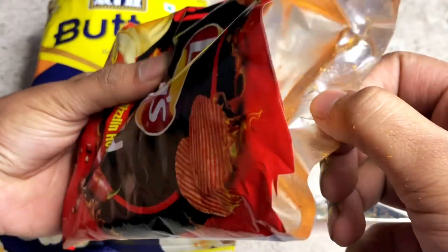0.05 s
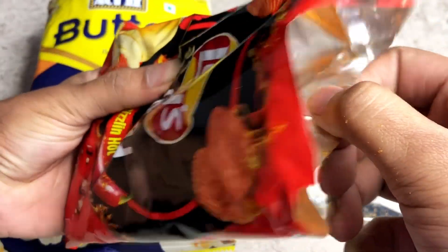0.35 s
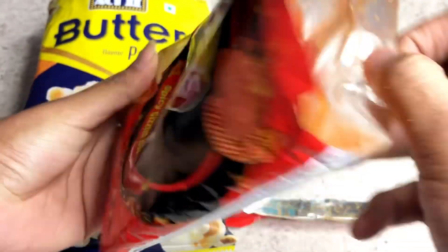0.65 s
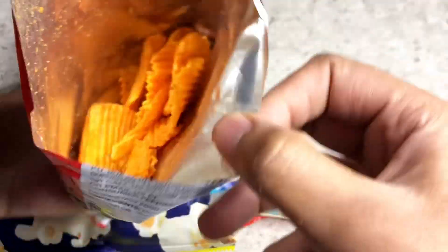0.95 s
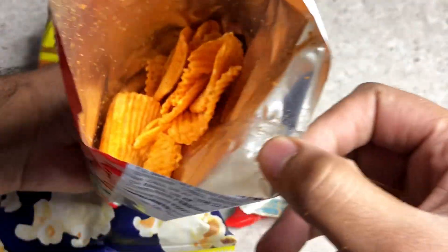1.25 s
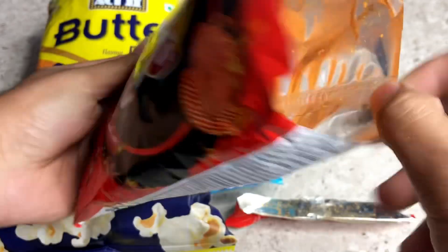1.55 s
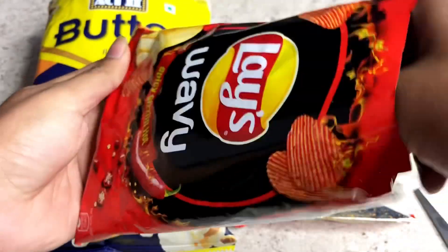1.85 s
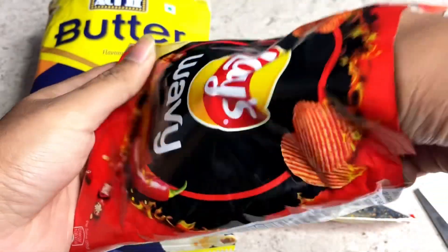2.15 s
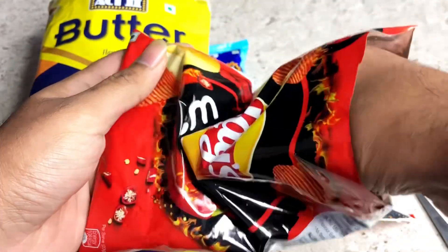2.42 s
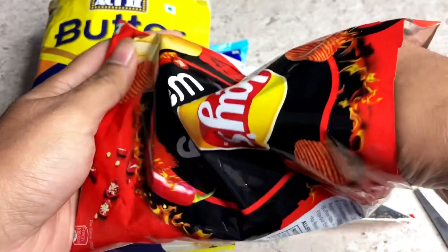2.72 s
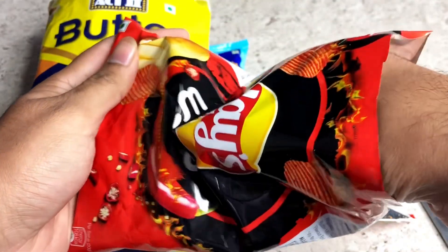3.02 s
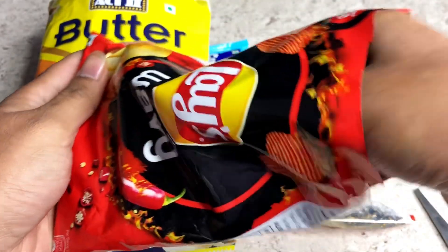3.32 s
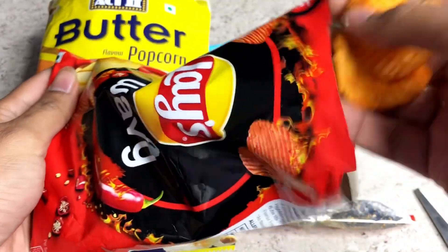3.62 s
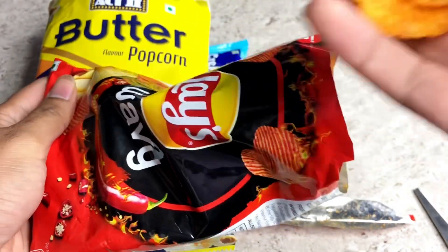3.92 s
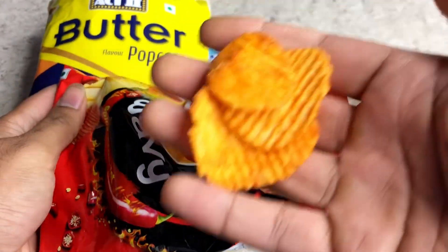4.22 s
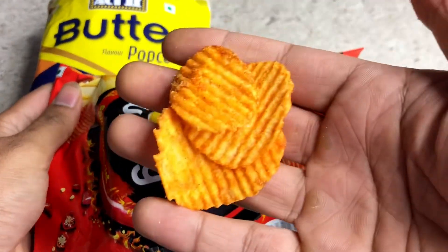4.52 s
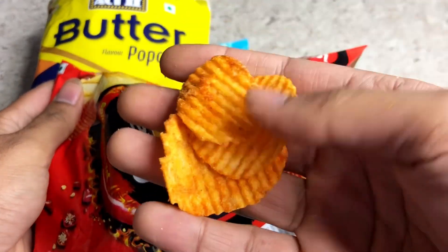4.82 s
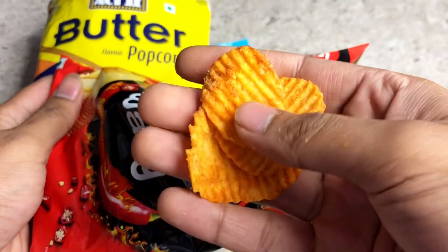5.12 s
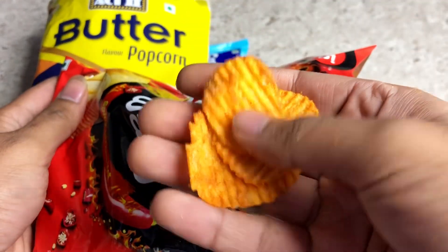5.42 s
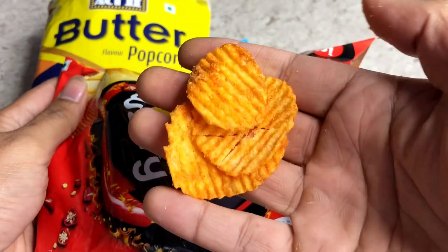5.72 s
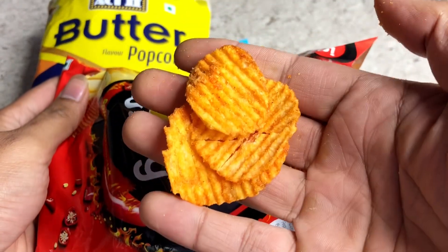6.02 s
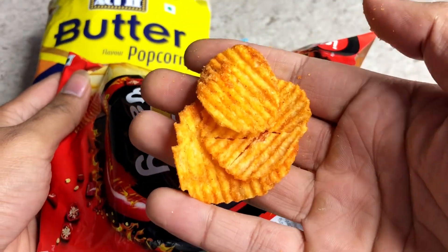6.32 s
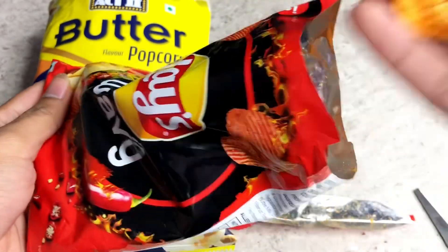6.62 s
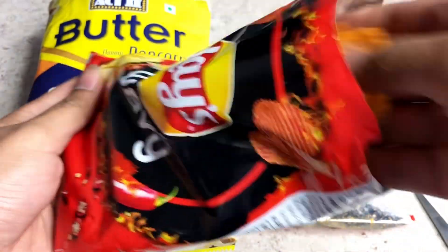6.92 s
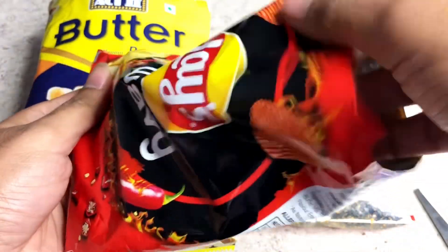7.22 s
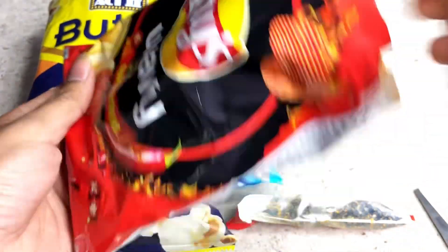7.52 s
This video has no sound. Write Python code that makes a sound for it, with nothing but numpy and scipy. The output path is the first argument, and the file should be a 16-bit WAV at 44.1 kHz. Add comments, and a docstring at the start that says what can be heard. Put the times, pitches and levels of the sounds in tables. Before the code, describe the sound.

Close to the microphone in a small, slightly echoing room, hands spread a foil snack packet open and rummage in it, making uneven bursts of crinkles and pops. A quiet stretch follows, with only dull room noise, until a crisp snaps sharply under a thumb with a few tiny crumbly ticks. After another short pause, the packet crinkles loudly again.

```python
"""A small hard room, microphone close to the hands. A foil snack packet is pulled open, a hand digs in
and takes out some crisps, a thumb snaps one on the palm, nearer still, and the hand goes back in.
The film buckles in sharp snaps over a fine crackle and rings the air in the packet.
The walls answer with a short tail; far behind lie dull room noise and a faint hum."""
import sys
import numpy as np
from scipy import signal
from scipy.fft import rfft, irfft
from scipy.io import wavfile
from scipy.ndimage import map_coordinates

SR = 44100
rng = np.random.default_rng(int(sys.argv[2]) if len(sys.argv) > 2 else 0)


def output_pcm(signal):
    """Save a mono or channel-first signal as 16-bit PCM at the path in sys.argv[1].

    Samples are clipped to [-1, 1] before scaling.
    """
    pcm = np.clip(np.atleast_2d(signal).T, -1, 1) * 32767
    wavfile.write(sys.argv[1], SR, np.round(pcm).astype(np.int16))


N = 333396
TIME = np.arange(N) / SR
TOP_HZ = 16000
GRIP_ATTACK_S = 0.016

# Levels are relative within each table; the functions set the balance.
# spectrum of the empty room: frequency_hz, level_db
ROOM_TONE = [(20, -44.5), (45, -18.5), (80, -14), (110, -14.5), (170, -18), (350, -18), (600, -20.5),
             (900, -27), (2500, -36), (9000, -40), (13000, -36), (16000, -43.5)]
# hum in the background: pitch_hz, level_db
HUM = [(102, -70.5), (124, -71.5)]
# a very faint falling tone: time_s, level_db, pitch_hz
WHINE = [(5.2, -86, 745), (5.5, -83, 715), (5.68, -78, 660), (5.85, -90, 620)]

# soft knocks, puffs of air and one longer low rub of the hands: start_s, level_db, fade_s
THUMPS = [(0.101, -38.5, 0.019), (0.831, -45.5, 0.066), (1.753, -38, 0.019), (4.27, -69.5, 0.2),
          (5.199, -66, 0.0051), (6.579, -50, 0.029), (6.97, -49.5, 0.028), (7.31, -43, 0.029)]
# their spectrum: frequency_hz, level_db
THUMP_COLOUR = [(30, -40.5), (60, -7.5), (110, -5), (160, -2.5), (260, -8), (600, -28), (3000, -73.5)]

# the crisp cracks: start_s, level_db, tilt_db_per_octave
CRACKS = [(5.03, -50.5, 2), (5.071, -46, -6.5), (5.111, -44, -2), (5.156, -44, -5), (5.175, -34, -4.5),
          (5.183, -28.5, -0.5), (5.197, -12, -2), (5.201, -13.5, -2.5), (5.211, -25.5, 5.5),
          (5.214, -23.5, 0.5), (5.219, -27.5, 3), (5.373, -42, -3), (5.462, -49, 17), (5.55, -46, -6.5),
          (5.797, -52, -0.5)]
# the thumb rubs the crisp: start_s, length_s, level_db
RUBS = [(4.945, .14, -63), (5.15, 0.012, -39.5), (5.27, 0.15, -54.5), (5.415, 0.028, -49.5)]
# spectrum of the crisp: frequency_hz, level_db
CRISP_COLOUR = [(100, -36), (260, -24), (700, -33), (1050, -23), (2200, -15), (3100, -2), (5000, -2),
                (8500, -5), (13000, 2.5), (14200, -2), (15500, 0)]

# snaps of the film that stand out from the crackle: start_s, level_db, tilt_db_per_octave
SNAPS = [(0.027, -26, 14.5), (0.098, -20, -7), (0.106, -20.5, 9), (0.157, -19.5, 10), (0.167, -24, 3),
         (0.209, -24.5, 2), (0.251, -26.5, -3), (0.259, -15.5, 3), (0.271, -21, 8), (0.314, -25, 6),
         (0.337, -22.5, 7), (0.53, -12.5, 2.5), (0.563, -19, 0), (0.588, -18.5, -1), (0.62, -30, -1),
         (0.631, -22, -1), (0.706, -23.5, -1.5), (0.784, -21, -2), (0.818, -18, 1), (0.935, -17.5, 4),
         (0.952, -17.5, -0.5), (1.194, -37.5, -14.5), (1.311, -29, -3.5), (1.344, -35, -7.5),
         (1.415, -29, -13.5), (1.561, -35.5, -15), (1.644, -34.5, -6), (1.735, -26.5, 2), (1.756, -20, 4),
         (1.778, -20.5, -2), (1.813, -19.5, 2.5), (1.859, -21.5, 2.5), (1.939, -14, 7.5), (2.057, -19, -2),
         (2.147, -20.5, -2.5), (2.19, -16.5, 5.5), (2.311, -17.5, 1), (2.398, -19.5, 1.5),
         (2.437, -20, -0.5), (2.499, -25.5, 0.5), (2.566, -24, -0.5), (2.626, -27, 0), (2.802, -20.5, -0.5),
         (2.851, -26, -2), (2.9, -21, -1.5), (2.975, -27.5, 8), (3.001, -25, 1), (3.014, -22.5, 1.5),
         (3.047, -17.5, 3.5), (3.092, -21, -2), (3.134, -29, -6), (3.176, -15, 1), (3.257, -20.5, 7.5),
         (3.282, -28.5, -0.5), (3.371, -31.5, 1), (3.536, -32.5, 7), (3.717, -29, -6.5), (3.817, -41, -3.5),
         (3.918, -44.5, -8), (6.529, -40, -3), (6.919, -22.5, 6.5), (7.07, -31.5, 3), (7.108, -30, 2),
         (7.127, -24, 0.5), (7.24, -26.5, -2), (7.259, -23, 2), (7.299, -16.5, 5), (7.32, -13.5, 0.5),
         (7.343, -15, 21), (7.508, -17.5, 0.5)]
# the hand strains the packet (opens, digs, draws out, goes back): start_s, length_s, panel_db, crease_db
GRIPS = [ (0.0, 0.029, -33, -28.5), (0.084, 0.022, -32, -22), (0.231, .087, -34.5, -29),
         (0.394, 0.048, -34, -27), (0.491, 0.12, -35.5, -28), (0.651, 0.2, -31, -22.5),
         (0.932, 0.018, -33, -49.5), (1.11, 0.15, -56.5, -80), (1.307, 0.13, -45.5, -69),
         (1.545, 0.13, -46.5, -47.5), (1.724, 0.18, -35, -35), (1.914, 0.096, -29.5, -25.5),
         (2.04, 0.15, -34.5, -33.5), (2.179, 0.16, -30, -24), (2.374, 0.15, -36.5, -35.5),
         (2.585, 0.087, -34.5, -29.5), (2.703, 0.055, -44, -28.5), (2.782, 0.055, -30, -25.5),
         (2.875, 0.11, -47, -39.5), (2.977, 0.15, -36, -36), (3.17, 0.23, -35.5, -36.5),
         (3.418, 0.065, -41, -42), (3.512, 0.13, -61, -48), (3.633, 0.12, -38.5, -42), (3.8, .17, -62, -63),
         (6.483, 0.092, -61, -53), (6.543, 0.047, -51, -39.5), (6.875, 0.1, -32, -32),
         (7.053, 0.077, -38, -37.5), (7.24, 0.1, -27, -22), (7.389, 0.052, -40.5, -35.5),
         (7.492, 0.033, -33, -28)]
# a crease runs across the film: peak_s, level_db, half_length_s
CREASE_RUNS = [(0.099, -17.5, 0.0055), (0.951, -16, 0.0022), (2.196, -29.5, 0.0052)]
# spectra of the film's snaps, wide panels and creases: frequency_hz, level_db
SNAP_COLOUR = [(50, -38.5), (150, -20.5), (400, -3), (750, -6.5), (1500, 2.5), (2300, 0), (4000, 0.5),
               (9000, -2.5), (13000, 0.5), (14200, -4), (15500, -5.5)]
PANEL_COLOUR = [(35, -43), (70, -17), (160, -5), (400, 0), (700, -5), (1100, -2), (1800, -5), (2400, -12),
                (4000, -14), (9000, -21.5)]
CREASE_COLOUR = [(200, -27), (700, -8), (1500, 0), (3500, 5), (6000, 0.5), (10000, 0), (13000, 7.5),
                 (14200, -7.5), (15500, -3.5)]
# resonances of the air in the packet: pitch_hz, width_hz, level_db
AIR_MODES = [(418, 18, -5.5), (535, 17, -4.5), (833.6, 9.8, -12.5), (847, 7, -1.5), (1007, 9.5, 0.5),
             (1240, 22.2, -7.5), (1565, 40, -9)]


def undb(db):
    """Decibels to gain."""
    return 10 ** (np.asarray(db) / 20)


def unit(x):
    """Scale to rms 1."""
    return x / np.sqrt(np.mean(x ** 2) + 1e-18)


def add(track, start_s, sound):
    """Mix a sound in at a time."""
    i = max(int(start_s * SR), 0)
    track[i:i + len(sound)] += sound[:max(N - i, 0)]


def wander(knots):
    """A random line through evenly spaced knots."""
    return np.interp(TIME, np.linspace(0, N / SR, knots), rng.standard_normal(knots))


def spectrum_db(points, hz):
    """Read a spectrum on a log-frequency axis."""
    point_hz, db = np.transpose(points)
    return np.interp(np.log(hz + 1), np.log(point_hz), db)


def response(db):
    """Causal impulse response of a dB spectrum, with unit energy."""
    cepstrum = irfft(db * np.log(10) / 20)
    half = len(cepstrum) // 2
    cepstrum[1:half] *= 2
    cepstrum[half + 1:] = 0
    impulse = irfft(np.exp(rfft(cepstrum)))
    return impulse / np.linalg.norm(impulse)


def coloured_noise(points):
    """Steady noise with the given spectrum; rms near 1."""
    impulse = response(spectrum_db(points, np.fft.rfftfreq(4096, 1 / SR)))
    return signal.fftconvolve(rng.standard_normal(N), impulse)[:N]


def background():
    """Far behind the hands: dull room noise, a wavering hum and a faint falling tone."""
    bed = undb(-65.5) * coloured_noise(ROOM_TONE)
    for hz, db in HUM:
        drift_hz, swell_db = .6 * wander(40), 3 * wander(40)
        bed += undb(db + swell_db) * unit(np.sin(2 * np.pi * np.cumsum(hz + drift_hz) / SR))
    time_s, level_db, pitch_hz = np.transpose(WHINE)
    whine_gain = undb(np.interp(TIME, time_s, level_db, left=-120, right=-120))
    whine = np.sin(2 * np.pi * np.cumsum(np.interp(TIME, time_s, pitch_hz)) / SR)
    return bed + whine_gain * whine


def room(direct, t60_s, treble_t60_s, wet_db, walls=3):
    """The direct sound plus diffuse tails off the hard walls; their top dies sooner."""
    t, wet = TIME[:SR], 0
    crossover = [signal.butter(2, 7000, kind, fs=SR, output="sos") for kind in ("low", "high")]
    onset = np.clip((t - .004) / .0028, 0, 1)
    for _ in range(walls):
        # crumpled film sends each click to each wall with slightly shifted resonances: a smooth tail
        shift_s = .0012 * wander(400)
        sent = map_coordinates(direct, [(TIME - shift_s) * SR], order=2)
        low, high = (signal.sosfilt(band, rng.standard_normal(SR)) for band in crossover)
        tail = onset * (low * 1000 ** (-t / t60_s) + undb(3) * high * 1000 ** (-t / treble_t60_s))
        wet = wet + signal.fftconvolve(sent, tail / np.linalg.norm(tail))[:N]
    return direct + undb(wet_db) * wet / np.sqrt(walls)


def thumps():
    """Soft knocks, puffs of air and one longer rub of the hands: low noise that swells fast and fades."""
    swell = np.zeros(N)
    for start_s, db, fade_s in THUMPS:
        add(swell, start_s, undb(db) * (1 - np.exp(-TIME / .001)) * np.exp(-TIME / fade_s))
    return undb(8.5) * swell * coloured_noise(THUMP_COLOUR)


def strain(start_s, length_s, release_s, attack_s=GRIP_ATTACK_S):
    """Strain builds up, holds while the hand moves, then relaxes."""
    rise = np.clip((TIME - start_s) / attack_s, 0, 1)
    return rise * np.exp(-np.maximum(TIME - start_s - length_s, 0) / release_s)


def click(points, tilt_db, ring_s, tick, patchy_db, lag_s, size=1024):
    """One sudden give: a tick and a short flutter of a small facet with resonances of its own."""
    t, hz = np.arange(size) / SR, np.fft.rfftfreq(size, 1 / SR) + 1
    flutter_s = ring_s * np.exp(.22 * rng.standard_normal())
    force = rng.standard_normal(size) * np.exp(-t / flutter_s)
    force /= np.linalg.norm(force)
    force[0] += tick * rng.choice([-1, 1])
    knots = np.linspace(0, np.sqrt(SR / 2), 28)
    facet_db = patchy_db * np.interp(np.sqrt(hz), knots, rng.standard_normal(len(knots)))
    octaves = np.log2(np.clip(hz, 900, 11000) / 4000)
    top_db = -20 * np.clip((hz - TOP_HZ) / 1000, 0, 1)
    body = response(spectrum_db(points, hz) + tilt_db * octaves + facet_db + top_db)
    # bending waves are slower at low pitch: 1 kHz arrives lag_s late, the treble first
    dispersion = np.exp(-4j * np.pi * lag_s * np.sqrt(hz * 1000))
    sound = irfft(rfft(force) * rfft(body) * dispersion)
    return sound / np.linalg.norm(sound)


def strikes(rows, points, ring_s, tick, patchy_db, lag_s):
    """Single clicks that stand out; each has the energy of 200 samples at its level."""
    track = np.zeros(N)
    for start_s, db, tilt_db in rows:
        sound = click(points, tilt_db, ring_s, tick, patchy_db, lag_s)
        add(track, start_s - lag_s / 2, undb(db) * np.sqrt(200) * sound)
    return track


def crackle(points, rate_hz, scatter_db, ring_s, patchy_db, even_s, count=60):
    """A stream of clicks from many facets, mostly weak and a few strong; rms near 1."""
    track, power = np.zeros(N), np.zeros(N)
    facets = [click(points, .98 * rng.standard_normal(), ring_s, .45, patchy_db, lag_s=.000928)
              for _ in range(count)]
    waits, strengths, picks = rng.random((N // 10, 3)).T
    # strain has to build up again after each click, so they seldom fall on top of each other
    times = np.cumsum(.5 - .5 * np.log(1 - waits)) / rate_hz
    for start_s, strength, pick in zip(times[times < TIME[-1]], strengths, picks):
        gain = undb(scatter_db * min(-np.log(1 - strength), 3.5))
        add(track, start_s, gain * facets[int(pick * count)])
        power[int(start_s * SR)] += gain ** 2
    # the hand feeds in energy steadily, so a strong click relieves its neighbours
    window = signal.windows.hann(int(even_s * SR))
    local_power = np.abs(signal.fftconvolve(power, window / window.sum(), "same"))
    return track / np.sqrt(local_power + 1e-4)


def crisp():
    """A crisp breaks under the thumb: brittle cracks, with crumbs grinding between them."""
    cracks = strikes(CRACKS, CRISP_COLOUR, ring_s=.0013, tick=.3, patchy_db=1.5, lag_s=.0005)
    crumbs = crackle(CRISP_COLOUR, rate_hz=400, scatter_db=5, ring_s=.0005, patchy_db=2.5, even_s=.012)
    rubbing = sum(undb(db) * strain(s, length_s, release_s=.01) for s, length_s, db in RUBS)
    breaking = undb(-24) * strain(start_s=5.191, length_s=.015, release_s=.014, attack_s=.005)
    return undb(-.5) * cracks + (rubbing + breaking) * crumbs


def packet():
    """Foil close to the microphone: snaps, dull flexing panels and creases, all ringing the air inside."""
    snaps = strikes(SNAPS, SNAP_COLOUR, ring_s=.0012, tick=.4, patchy_db=3, lag_s=.0011)
    buckles = crackle(CREASE_COLOUR, rate_hz=100, scatter_db=4, ring_s=.0009, patchy_db=4, even_s=.08)
    fizz = crackle(CREASE_COLOUR, rate_hz=1600, scatter_db=2, ring_s=.001, patchy_db=3.5, even_s=.012)
    panels = crackle(PANEL_COLOUR, rate_hz=330, scatter_db=4, ring_s=.0026, patchy_db=5, even_s=.2)
    pops = crackle(SNAP_COLOUR, rate_hz=40, scatter_db=2.5, ring_s=.0011, patchy_db=5, even_s=.3)
    # the wide panels settle more slowly than the creases
    flexing = sum(undb(db) * strain(s, length_s, release_s=.055) for s, length_s, db, _ in GRIPS)
    creasing = sum(undb(db) * strain(s, length_s, release_s=.015) for s, length_s, _, db in GRIPS)
    running = sum(undb(db) * np.exp(-((TIME - s) / half_s) ** 2) for s, db, half_s in CREASE_RUNS)
    creases = creasing * (undb(.5) * buckles + undb(-5) * pops + undb(-16) * fizz)
    film = undb(-.5) * snaps + undb(-2.5) * flexing * panels + undb(-5.5) * creases + running * fizz
    air = sum(undb(db) * signal.lfilter(*signal.iirpeak(hz, hz / width_hz, SR), film)
              for hz, width_hz, db in AIR_MODES)
    return film + undb(-2.5) * air


def scene():
    """Packet, crisp and hands at one microphone; the crisp is held nearer, so more of it arrives direct."""
    brittle = crisp()
    near = packet() + undb(-1.5) * brittle + thumps()
    in_room = room(near, t60_s=.5, treble_t60_s=.25, wet_db=-11)
    return (in_room + undb(-18.5) * brittle + background())[None]


def record(dry):
    """The microphone rounds the tallest peaks and the top is cut off."""
    lowpass = signal.ellip(10, .2, 70, TOP_HZ, fs=SR, output="sos")
    return signal.sosfilt(lowpass, np.tanh(dry))


dry = scene()
out = record(dry)
output_pcm(out)
```